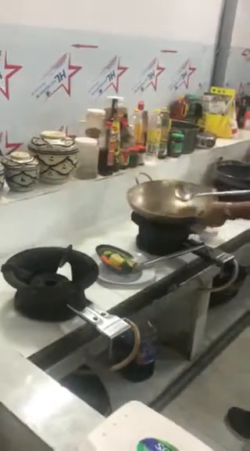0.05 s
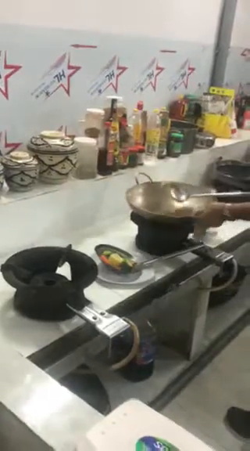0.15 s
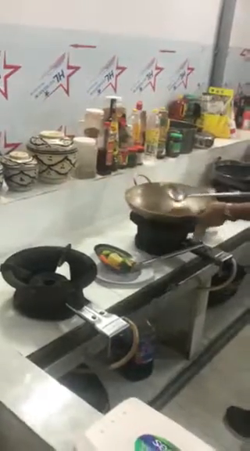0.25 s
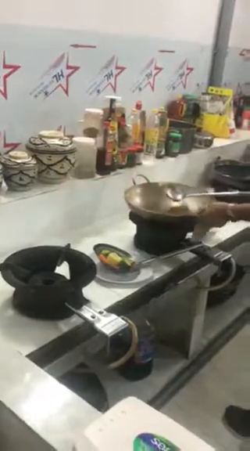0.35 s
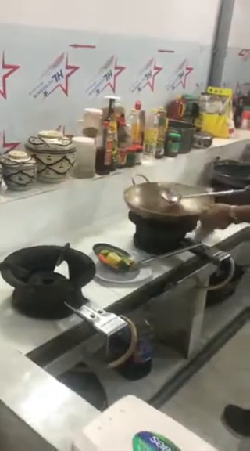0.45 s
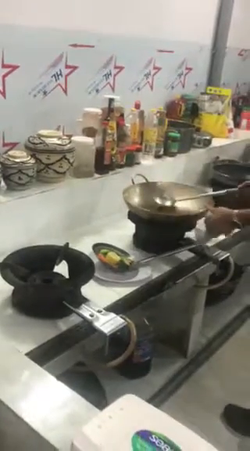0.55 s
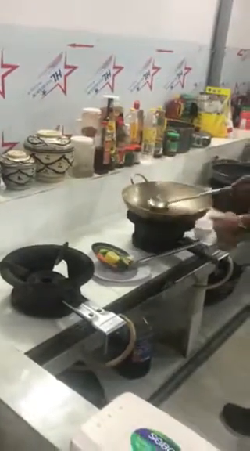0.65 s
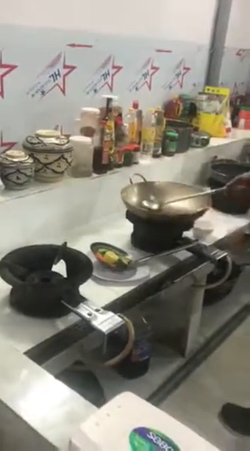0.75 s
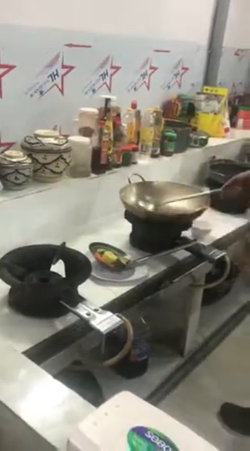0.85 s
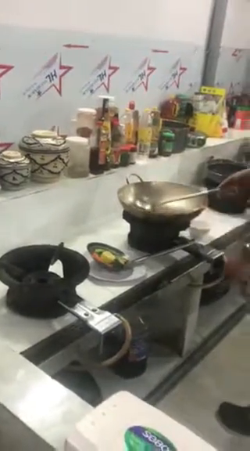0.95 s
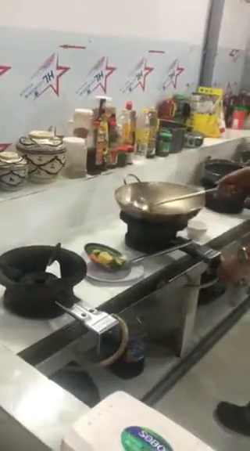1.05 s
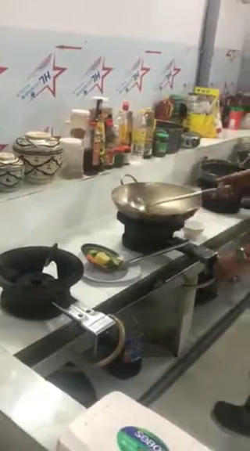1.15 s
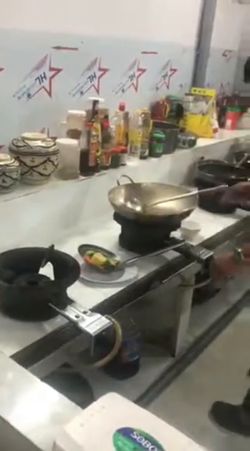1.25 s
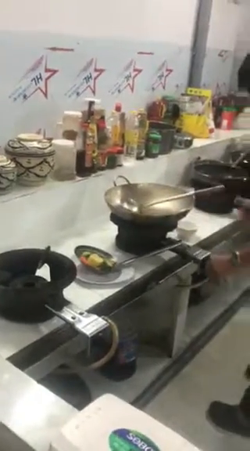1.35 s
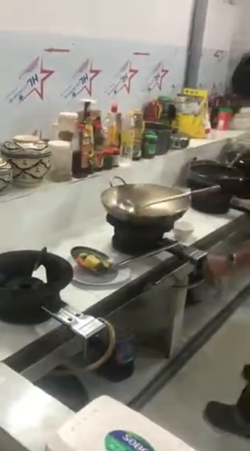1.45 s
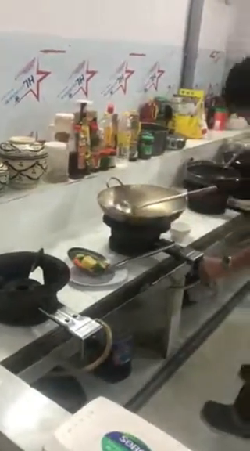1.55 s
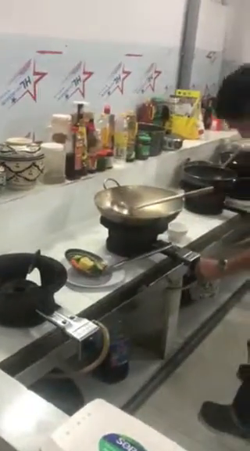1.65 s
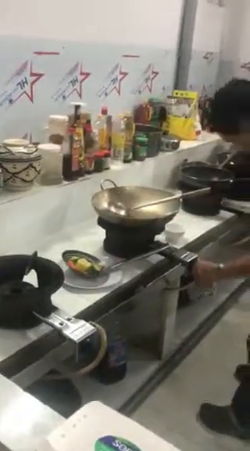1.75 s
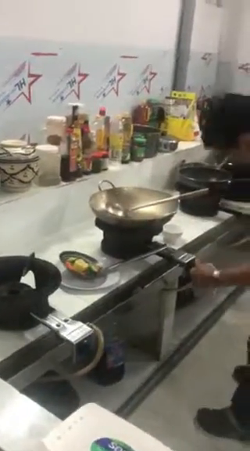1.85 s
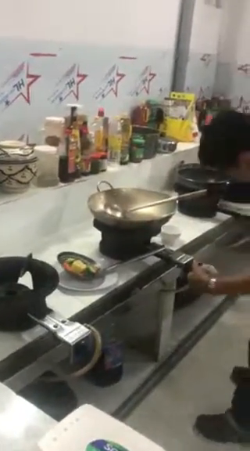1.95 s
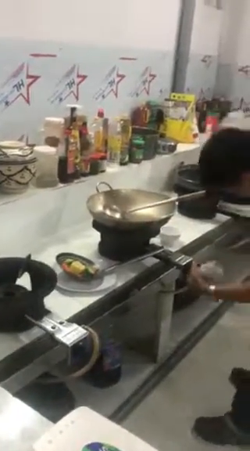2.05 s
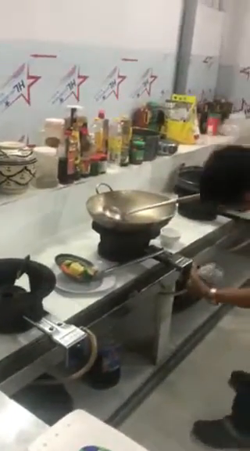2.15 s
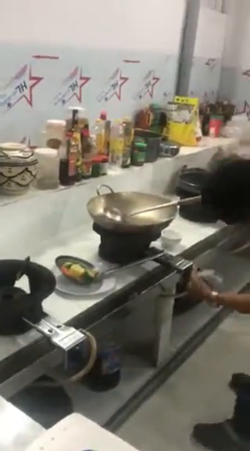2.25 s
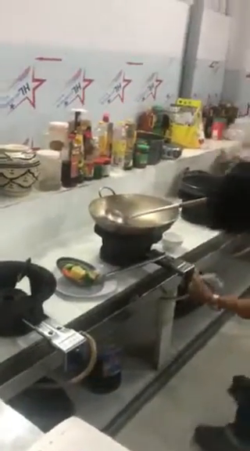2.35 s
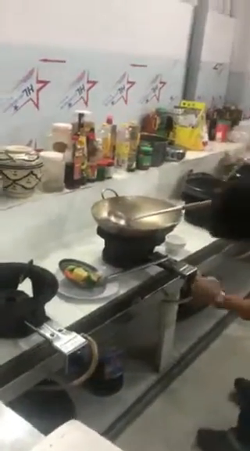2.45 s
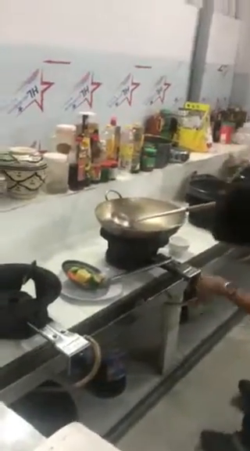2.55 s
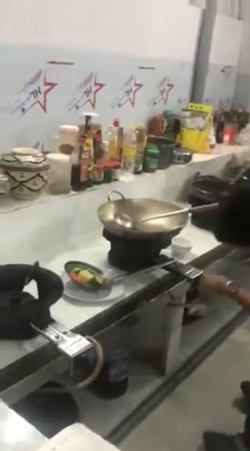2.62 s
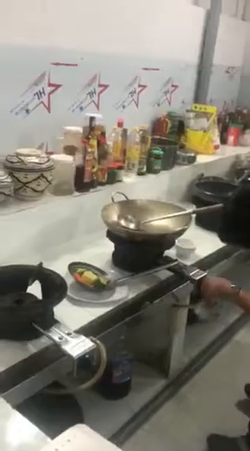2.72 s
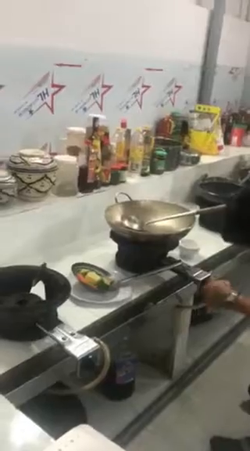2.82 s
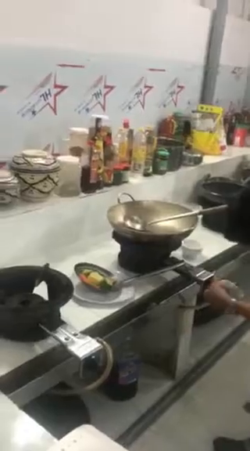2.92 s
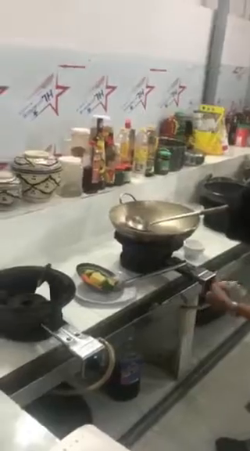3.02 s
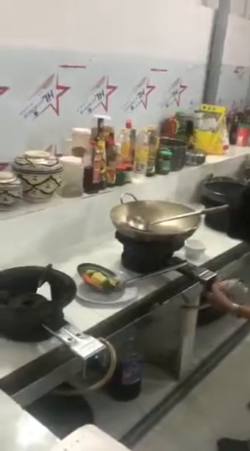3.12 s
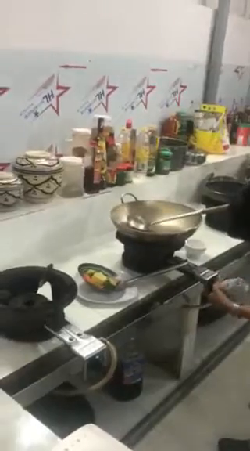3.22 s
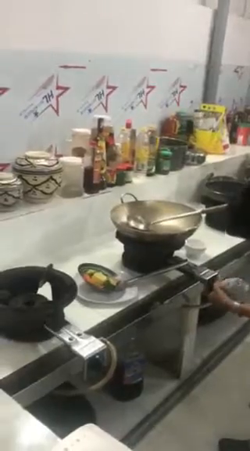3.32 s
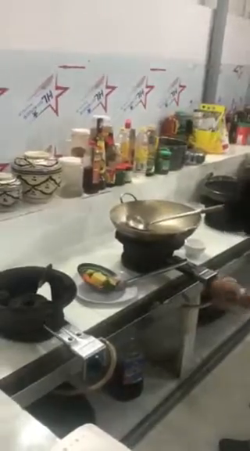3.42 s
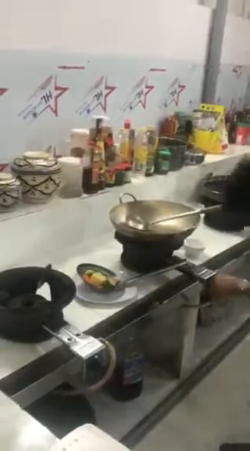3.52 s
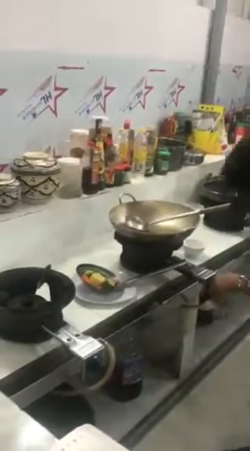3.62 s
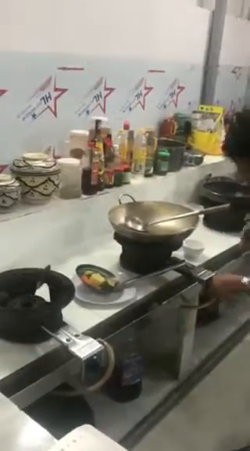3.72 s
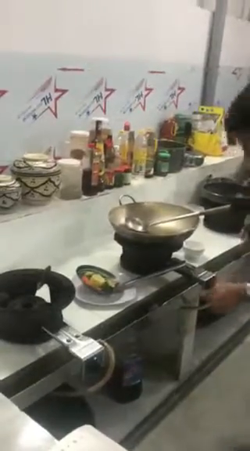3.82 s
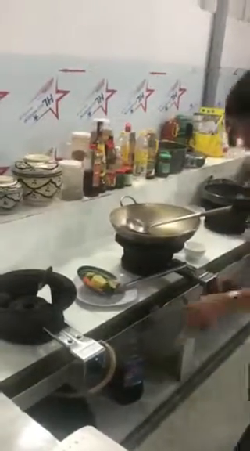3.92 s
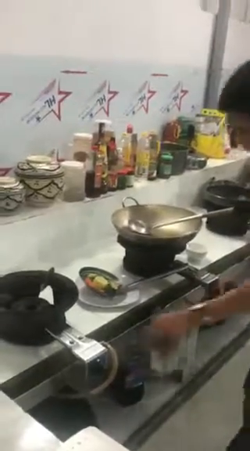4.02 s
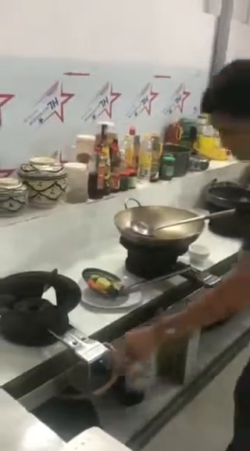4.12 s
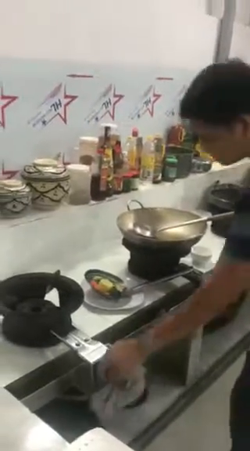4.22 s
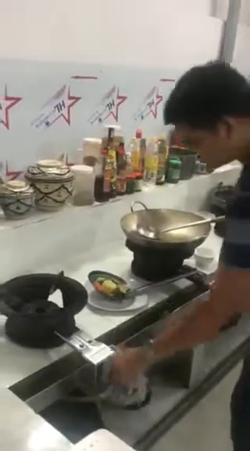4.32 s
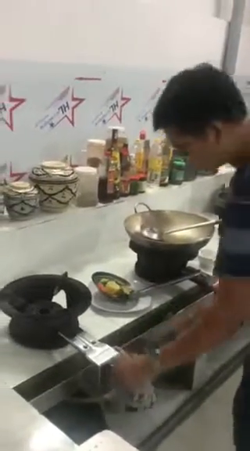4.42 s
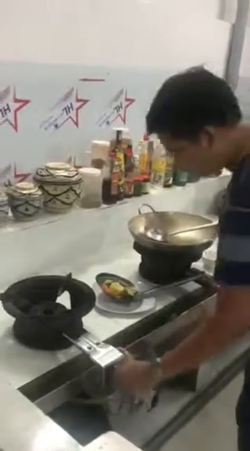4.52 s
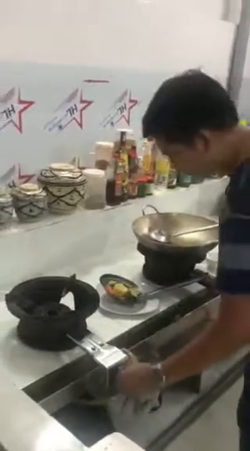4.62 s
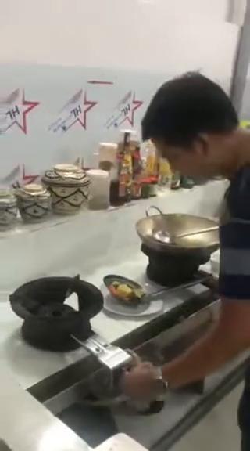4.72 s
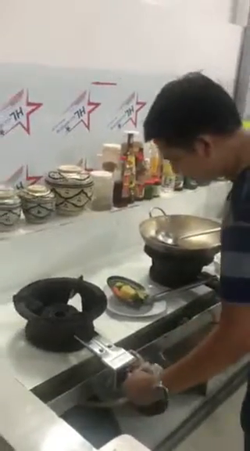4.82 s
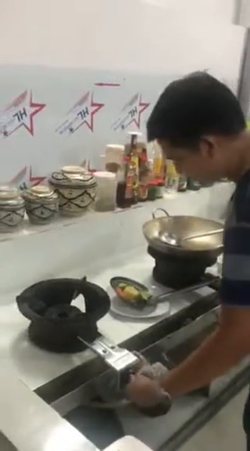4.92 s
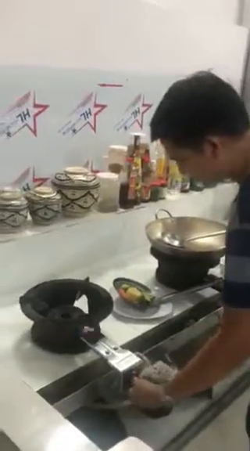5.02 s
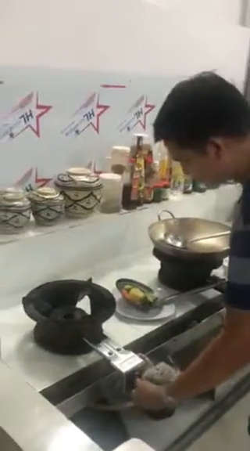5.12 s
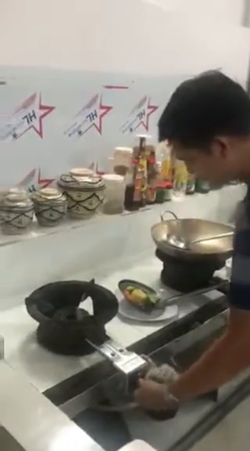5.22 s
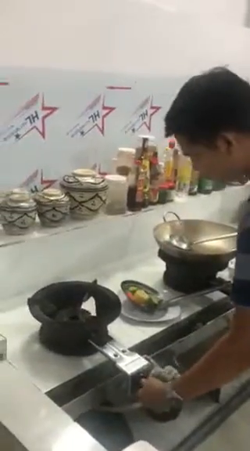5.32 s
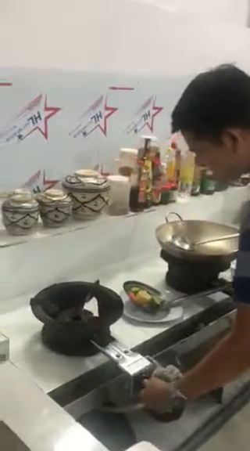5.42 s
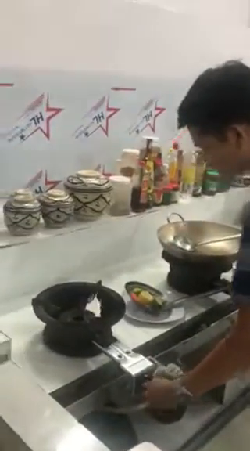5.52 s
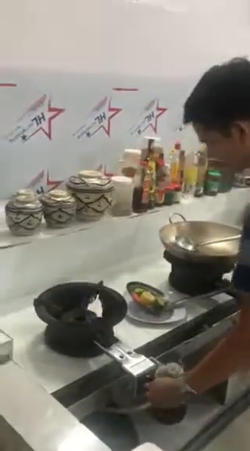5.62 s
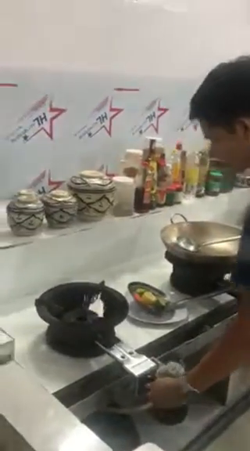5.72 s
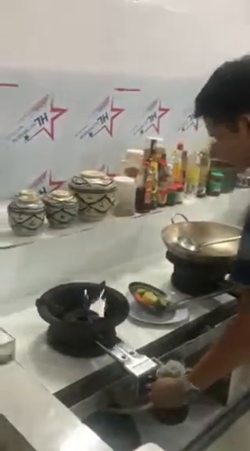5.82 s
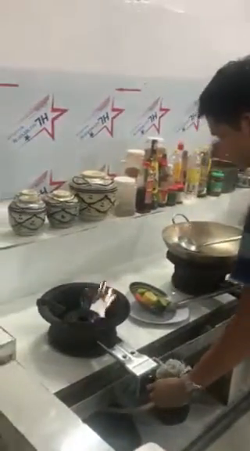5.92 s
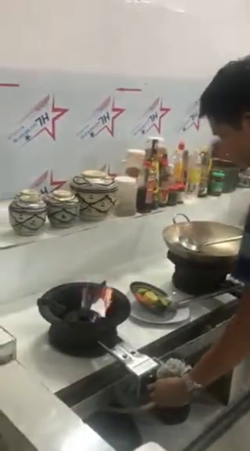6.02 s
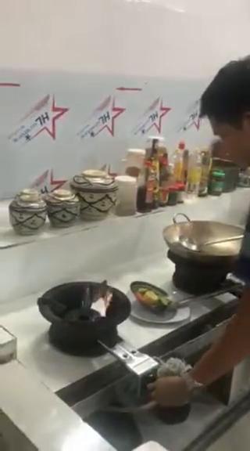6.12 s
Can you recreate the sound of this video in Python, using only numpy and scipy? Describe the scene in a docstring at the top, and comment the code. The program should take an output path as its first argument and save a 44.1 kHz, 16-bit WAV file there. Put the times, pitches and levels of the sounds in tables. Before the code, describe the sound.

A metal ladle clanks into a steel wok, then gas stove igniters snap and knobs click in an echoing kitchen.

```python
"""In a tiled kitchen, a steel ladle knocks, scrapes and drops into a wok, which rings and rocks on its
burner. Dull footsteps follow. The cook turns two gas valves: their spring igniters snap and jolt the
stove, the knobs click, and the second burner puffs alight. Between the two valves a cloth is slapped
down and rubbed along; near the end loose steel clanks. Each steel hit is a crack of noise plus ringing
notes. The tiles echo these sounds, over a motor's hum and the hiss of moving air."""
import sys
import numpy as np
from scipy import signal
from scipy.fft import rfft, irfft
from scipy.io import wavfile
from scipy.ndimage import uniform_filter1d

SR = 44100
rng = np.random.default_rng(int(sys.argv[2]) if len(sys.argv) > 2 else 0)


def int16_out(signal):
    """Quantize to a 16-bit WAV file."""
    q = np.round(np.clip(np.atleast_2d(signal).T, -1, 1) * 32767)
    wavfile.write(sys.argv[1], SR, q.astype(np.int16))


N = 271656
TIME = np.arange(N) / SR
RING_TIME = TIME[:SR]  # one second, the length of each hit
TOP_HZ = 9450

# the ladle touches and scrapes the wok: t/s, level/dB, contact/s
LADLE_TOUCHES = [(0.002, -39, 0.038), (0.165, -34.5, .004), (0.540, -38, 0.0099), (0.651, -38, 0.023),
                 (1.003, -33.5, 0.012), (1.292, -50, .007)]
# the wok is set down on its burner, then the ladle lands in it: t/s, level/dB, brightness/(dB per octave),
# rocking level/dB
WOK_LANDINGS = [(0.307, -35.5, -4, -31), (0.7426, -14, -0.47, -25)]
# footsteps: t/s, level/dB, f/Hz
FOOTSTEPS = [(1.122, -42.5, 139), (1.909, -36, 169), (1.989, -42.5, 292)]
# each igniter's snaps, and the loose steel's clank: t/s, level/dB, brightness/(dB per octave), chatter/s
FIRST_IGNITER_SNAPS = [(2.1998, -16.5, -0.5, 0.0083), (3.285, -16.5, -2.1, 0.0083)]
SECOND_IGNITER_SNAPS = [(5.1398, -18, 0, 0.012)]
CLANK_HITS = [(6.118, -30, -2.5, 0.029)]
# knob clicks: t/s, level/dB
KNOB_CLICKS = [(2.6913, -31), (2.967, -50), (3.511, -46.5), (3.632, -30), (3.94, -51), (4.556, -51.5),
               (4.808, -47.5)]
# puffs of burning gas: peak t/s, level/dB, rise/(dB per s)
GAS_PUFFS = [(5.68, -47, 35), (6.13, -45, 120)]

# the notes (modes) each object rings with: f/Hz, level/dB, t60/s (time to fade 60 dB, before damping)
LADLE_NOTES = [(1090, 0, .35), (1235, -3, .3), (1790, -8, .25), (2200, -4, .25), (2890, -3, .22),
               (3045, 0, .2), (3400, -4, .22), (3690, -4, .25), (4400, -5, .2), (5350, -8, .2),
               (5900, -6, .2), (6480, -8, .2)]
WOK_NOTES = [(390, -3, .5), (553, -9, .45), (646, -14, .42), (930, -9, .12), (1346, -13, .25),
             (1595, -10, .32), (1776, -2, .32), (1942, -9, .32), (2118, 1, .24), (2450, -13, .3),
             (2622, -5, .36), (2890, -3, .13), (3045, 4.5, .13), (3390, -11, .3), (3681, 5, .15),
             (3830, -9, .16), (4312, -3, .13), (4420, -8, .12), (5280, -11, .15), (5682, -11, .33),
             (5890, -4, .17), (6555, -5, .14), (8000, -15, .14), (8450, -13, .2), (8650, -11, .12)]
SEAT_NOTES = [(1206, -5, .25), (1346, 0, .25), (2110, -7, .18)]  # where the wok sits on its burner
FIRST_IGNITER_NOTES = [(1318, -13, .2), (1630, -8, .2), (1918, -12, .26), (2960, -3, .17), (3022, 2, .22),
                       (3095, -4, .18), (3250, -6, .22), (3430, -3, .27), (3782, 2, .2), (4585, 3, .11),
                       (5120, -8, .16), (5570, -6, .17), (6470, -9, .17), (6825, -7, .25), (8170, -5, .17),
                       (8518, 2, .2), (8787, -1, .18), (9220, -8, .24)]
SECOND_IGNITER_NOTES = [(1225, -8, .22), (1590, -1, .18), (1900, -5, .17), (2966, 1, .2), (3070, -2, .22),
                        (3200, 2, .22), (3450, -2, .24), (4759, -5, .2), (5512, 0, .17), (6330, -1, .2),
                        (8366, 1, .19), (8700, -1, .17), (9200, 1, .17)]
KNOB_NOTES = [(1312, -11, .3), (3400, -5, .25), (3920, 0, .26), (4620, -6, .22), (6150, -7, .18),
              (8030, -4, .18), (8660, 1, .17)]
CLANK_NOTES = [(1230, -2, .25), (1420, -1, .25), (2000, 2, .25), (2300, -2, .2), (3100, -2, .2),
               (3900, -3, .2), (4480, -3, .2), (5300, -4, .2), (8350, -5, .15)]

# each object's many short-lived notes, which blur into a crack of noise: f/Hz, level/dB
LADLE_CRACK = [(150, 1), (400, 9), (700, 1.5), (1150, 1), (1450, -4), (2200, -2.5), (4200, -0.5),
               (4900, -4), (6200, -2.5), (7300, -4.5), (9000, -6), (9600, -47)]
WOK_CRACK = [(60, -31), (130, 7), (260, -8.5), (430, 4.5), (800, -5), (1150, -7.5), (1450, -22),
             (2000, -12), (2330, -15), (3000, -0.5), (3800, 0.5), (5000, -3), (6400, -2.5), (8700, -13),
             (9500, -28)]
FIRST_IGNITER_CRACK = [(100, -23.5), (250, -40), (600, -15), (950, -25.5), (1400, -21), (2450, -13.5),
                       (3030, -2.5), (4200, -7), (5200, -8), (7200, -11), (8400, -1), (9800, -13.5)]
SECOND_IGNITER_CRACK = [(100, -27), (250, -8.5), (600, -15), (950, -23), (1600, -12), (2200, -9),
                        (3030, -1), (4500, -4.5), (6500, -7), (7600, -7), (8900, -0.5), (9800, -11)]
KNOB_CRACK = [(300, -32), (1300, -23), (2400, -9), (3300, -1.5), (4200, 3.5), (5300, -2), (6300, 5.5),
              (7400, 2), (8600, 8.5), (9800, -31)]
CLANK_CRACK = [(150, -25), (500, 2.5), (1300, 2), (2100, 5), (4300, 4), (5000, 5), (8500, 7.5), (9800, -36)]

# the colour (balance of low and high) of moving air, rubbing cloth and catching gas: f/Hz, level/dB
AIR_HISS = [(20, -39.5), (32, -15), (45, -6.5), (70, -7.5), (103, -1), (170, -9.5), (250, -5.5),
            (400, -15.5), (700, -17), (1500, -22), (4000, -23.5), (8800, -25.5), (9050, -21), (9250, -54)]
CLOTH_RUB = [(200, 6), (450, 3), (700, 8), (1100, 8.5), (1500, -6), (3000, -8), (9000, -43)]
FLAME_RUSH = [(60, -2.5), (130, 1.5), (250, 4), (450, -7), (800, -7), (1500, -15.5), (4000, -26),
              (9000, -49)]
# how long the tiled room echoes: f/Hz, t60/s
ECHO_TIMES = [(150, 1), (500, 0.51), (1500, 0.39), (3200, 0.51), (6000, 0.37), (9000, 0.36)]


def undb(db):
    """Turn decibels into a number to multiply by."""
    return 10 ** (np.asarray(db) / 20)


def unit(x):
    """Scale a signal to an average strength (rms) of 1."""
    return x / np.sqrt(np.mean(x ** 2))


def blow(x, db):
    """Give a short sound the energy of 10 ms at this level."""
    return x * undb(db) / np.sqrt(np.sum(x ** 2) / (SR / 100))


def add(out, s, x):
    """Mix x into out, starting at s seconds."""
    i = max(int(s * SR), 0)
    out[i:i + len(x)] += x[:N - i]


def along(points, hz):
    """Read between (f/Hz, value) points, with octaves evenly spaced."""
    f, value = np.transpose(points)
    return np.interp(np.log(hz + 1), np.log(f), value)


def noise(colour, size, tilt_db=0):
    """Noise of a given colour, made brighter by tilt_db per octave."""
    hz = np.fft.rfftfreq(size, 1 / SR)
    gain = undb(along(colour, hz) + tilt_db * np.log2(np.maximum(hz, 300) / 1000))
    return unit(irfft(rfft(rng.standard_normal(size)) * gain * (hz < TOP_HZ * 1.05), size))


def wander(rate):
    """A random curve of size about 1 that turns `rate` times a second."""
    span = int(SR / rate)
    steps = np.repeat(rng.standard_normal(N // span + 1), span)
    return unit(uniform_filter1d(steps, span)[:N])


def burst(hold_s, t60):
    """A loudness curve that holds while the contact lasts, then dies away."""
    return np.exp(-np.log(1000) * np.maximum(RING_TIME - hold_s, 0) / t60)


def swell(s, hold_s, rise_db_per_s, fall_db_per_s):
    """A loudness curve that rises until s seconds, holds and falls."""
    before, after = np.maximum(s - TIME, 0), np.maximum(TIME - s - hold_s, 0)
    return undb(-rise_db_per_s * before - fall_db_per_s * after)


def rustle(loudness, colour, flutter_db):
    """Fluttering noise that follows a loudness curve."""
    return noise(colour, N) * loudness * undb(flutter_db * wander(60))


def resonate(x, hz, width_hz, boost_db):
    """Make a sound stronger around each note."""
    f = np.fft.rfftfreq(len(x), 1 / SR)
    peaks = np.max(1 / (1 + (2 * (f - hz) / width_hz) ** 2), axis=0)
    return irfft(rfft(x) * (1 + undb(boost_db) * peaks), len(x))


def strikes(hits, notes, colour, ring_db, crack_t60, grit_db, damping, early_db):
    """Steel hits steel: the parts chatter with a noisy crack, and clear notes ring on."""
    out = np.zeros(N)
    hz, note_db, t60 = np.transpose(notes)[:, :, None]
    for s, db, bright_db, chatter_s in hits:
        contact = burst(chatter_s, crack_t60)
        bounces = undb(grit_db * np.repeat(rng.uniform(-1.5, 1.5, SR // 30 + 1), 30)[:SR])
        crack = resonate(noise(colour, SR, bright_db) * bounces, hz, width_hz=90, boost_db=4) * contact
        # each spot that is hit favours different notes
        spot_db, phase = rng.standard_normal((len(hz), 2)).T[:, :, None]
        gain = undb(note_db + spot_db + bright_db * np.log2(hz / 1000))
        waves = np.sin(2 * np.pi * (hz * RING_TIME + phase))
        ring = np.sum(gain * waves * burst(0, t60 / damping), axis=0)
        ring *= 1 - np.exp(-4 * RING_TIME / chatter_s)  # builds up bounce by bounce
        ring *= 1 + undb(early_db) * contact  # this extra part is lost as the pieces touch
        add(out, s, blow(blow(crack, 0) + blow(ring, ring_db), db))
    return out


def tone(notes, build_s):
    """A few clear notes that build up quickly and fade."""
    hz, note_db, t60 = np.transpose(notes)[:, :, None]
    ring = np.sum(undb(note_db) * np.sin(2 * np.pi * hz * RING_TIME) * burst(0, t60), axis=0)
    return ring * (1 - np.exp(-RING_TIME / build_s))


def thumps(hits, t60, side_db):
    """Soft, heavy hits (t/s, level/dB, f/Hz, contact/s): noise around one pitch each."""
    out = np.zeros(N)
    attack = 1 - np.exp(-RING_TIME / .003)
    for s, db, hz, contact_s in hits:
        hump = [(hz / 8, 2 * side_db), (hz / 2, side_db), (hz, 0),
                (hz * 2, side_db), (hz * 16, 4 * side_db)]
        add(out, s, blow(noise(hump, SR) * burst(contact_s, t60) * attack, db))
    return out


def hum_and_air(hum_hz, hum_db, air_db):
    """A motor hums, wavering in pitch and loudness, and moving air hisses."""
    pitch_hz = hum_hz + 1.17 * wander(2.8)
    hum = np.sin(2 * np.pi * np.cumsum(pitch_hz) / SR) * undb(hum_db + 4.3 * wander(4.1))
    return hum + noise(AIR_HISS, N) * undb(air_db + .5 * wander(3.75))


def ladle():
    """The ladle rings as it lightly taps and scrapes the wok."""
    bright_db = -0.5  # per octave
    hits = [(s, db, bright_db, contact_s) for s, db, contact_s in LADLE_TOUCHES]
    return strikes(hits, LADLE_NOTES, LADLE_CRACK,
                   ring_db=-6, crack_t60=0.18, grit_db=-2.5, damping=0.49, early_db=-7)


def wok():
    """The wok is set down on its burner, then the ladle lands in the bowl; each blow makes it ring."""
    chatter_s = 0.0062
    hits = [(s, db, bright_db, chatter_s) for s, db, bright_db, _ in WOK_LANDINGS]
    return strikes(hits, WOK_NOTES, WOK_CRACK,
                   ring_db=2.5, crack_t60=0.021, grit_db=3, damping=1.94, early_db=-13)


def rocking(bump_db, hollow_db, seat_db):
    """Each landing tips the wok on its burner; it drops back with a hollow note and bounces once."""
    out = np.zeros(N)
    rock_hz, contact_s = 426, 0.014
    bumps = [(.572, -36.5, rock_hz, contact_s)]  # the wok settles as the hand lets go
    for s, _, _, db in WOK_LANDINGS:
        drop_s = s + .018
        bumps += [(s, db - 5, 920, 0.0057),  # the hit clunks it onto the burner
                  (drop_s, db + bump_db, rock_hz, contact_s),
                  (drop_s + 0.062, db + bump_db - 8, rock_hz, contact_s)]  # the weaker bounce
        add(out, s, blow(tone(SEAT_NOTES, build_s=0.0023), db + seat_db))
        add(out, drop_s, blow(tone(WOK_NOTES[:3], build_s=.005), db + hollow_db))
    return out + thumps(bumps, t60=0.17, side_db=-10)


def footsteps(contact_s):
    """Shoes thud softly on the floor."""
    return thumps([(s, db, hz, contact_s) for s, db, hz in FOOTSTEPS], t60=0.13, side_db=-13.5)


def igniters(jolt_db, jolt_s, first_thump_hz, second_thump_hz):
    """Spring hammers snap in the two valves, and each snap jolts the stove into a low thump."""
    first = strikes(FIRST_IGNITER_SNAPS, FIRST_IGNITER_NOTES, FIRST_IGNITER_CRACK,
                    ring_db=-6, crack_t60=0.032, grit_db=4.5, damping=1.3, early_db=-19)
    second = strikes(SECOND_IGNITER_SNAPS, SECOND_IGNITER_NOTES, SECOND_IGNITER_CRACK,
                     ring_db=-6.5, crack_t60=0.048, grit_db=10, damping=1.6, early_db=4)
    valves = [(FIRST_IGNITER_SNAPS, first_thump_hz), (SECOND_IGNITER_SNAPS, second_thump_hz)]
    jolts = [(s, db + jolt_db, hz, jolt_s) for snaps, hz in valves for s, db, _, _ in snaps]
    return first + second + thumps(jolts, t60=.12, side_db=-11.5)


def knobs(firm_db, chatter_s):
    """The valve knobs click; the softer the click, the duller it sounds."""
    dulling = 0.24  # dB per octave for each dB below a firm click
    hits = [(s, db, dulling * (db - firm_db), chatter_s) for s, db in KNOB_CLICKS]
    return strikes(hits, KNOB_NOTES, KNOB_CRACK,
                   ring_db=-10, crack_t60=0.06, grit_db=0.5, damping=1.7, early_db=-1)


def cloth(lands_s, slap_hz, counter_hz):
    """A cloth sweeps in, slaps the steel counter, rubs along it and lifts off."""
    contact_s = 0.028
    hits = [(lands_s, -42, slap_hz, contact_s), (lands_s, -41, counter_hz, contact_s)]
    slap = thumps(hits, t60=0.15, side_db=-20)
    rub = undb(-52) * swell(lands_s, hold_s=.21, rise_db_per_s=123, fall_db_per_s=156)
    return slap + rustle(rub, CLOTH_RUB, flutter_db=3)


def flame():
    """Gas catches at the burner in soft puffs that swell and quickly die."""
    flow = sum(undb(db) * swell(s, 0, rise, fall_db_per_s=130) for s, db, rise in GAS_PUFFS)
    return rustle(flow, FLAME_RUSH, flutter_db=3)


def clank():
    """Loose steel knocks together once and rings."""
    return strikes(CLANK_HITS, CLANK_NOTES, CLANK_CRACK,
                   ring_db=-8, crack_t60=0.13, grit_db=-1, damping=1.3, early_db=-3)


def room(x, echo_db, onset_s):
    """The tiles add a smooth echo in which the bass lasts longest."""
    hz = np.fft.rfftfreq(SR, 1 / SR)
    scatter = rfft(rng.standard_normal(SR))
    centres, t60s = np.transpose(ECHO_TIMES)
    bands = [irfft(scatter * along(np.c_[centres, share], hz), SR) for share in np.eye(len(t60s))]
    tail = sum(band * burst(0, t60) for band, t60 in zip(bands, t60s))
    tail *= 1 - np.exp(-(RING_TIME / onset_s) ** 2)
    tail /= np.sqrt(np.sum(tail ** 2))
    return x + undb(echo_db) * signal.fftconvolve(x, tail)[:N]


def scene():
    """The cook's sounds echo in the kitchen, over the hum and the air."""
    cook = ladle() + wok() + rocking(bump_db=-0.5, hollow_db=1, seat_db=-10.5)
    cook += footsteps(contact_s=0.028)
    cook += igniters(jolt_db=-22, jolt_s=0.058, first_thump_hz=370, second_thump_hz=101)
    cook += knobs(firm_db=-24.5, chatter_s=0.0024)
    cook += cloth(lands_s=4.4, slap_hz=1030, counter_hz=208)
    cook += flame() + clank()
    echoing = room(cook, echo_db=-6, onset_s=0.0052)
    return (echoing + hum_and_air(hum_hz=49.7, hum_db=-56.5, air_db=-49.9))[None]


def record(dry):
    """Drop the deepest bass and cut off the highest treble."""
    thin = signal.sosfilt(signal.butter(3, 36, "high", fs=SR, output="sos"), dry)
    return signal.sosfilt(signal.ellip(10, .2, 75, TOP_HZ, fs=SR, output="sos"), thin)


dry = scene()
out = record(dry)
int16_out(out)
```